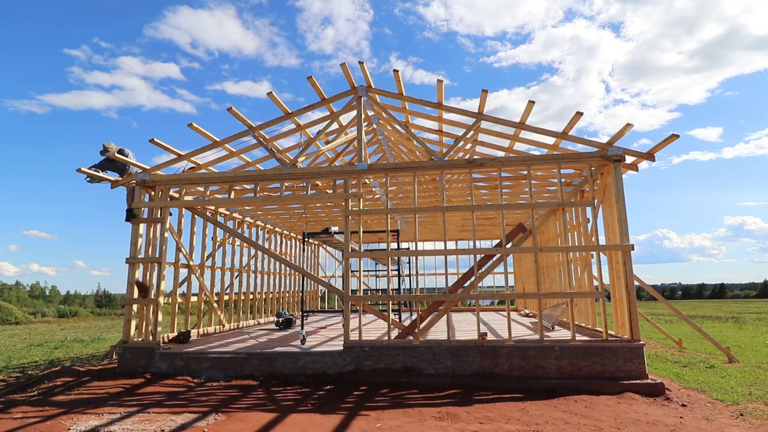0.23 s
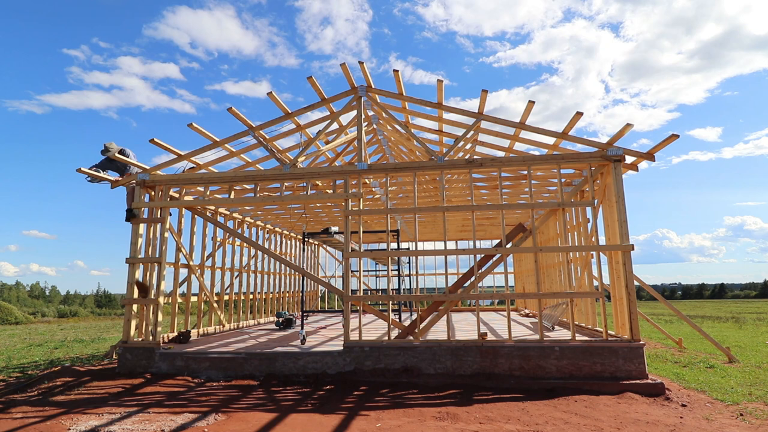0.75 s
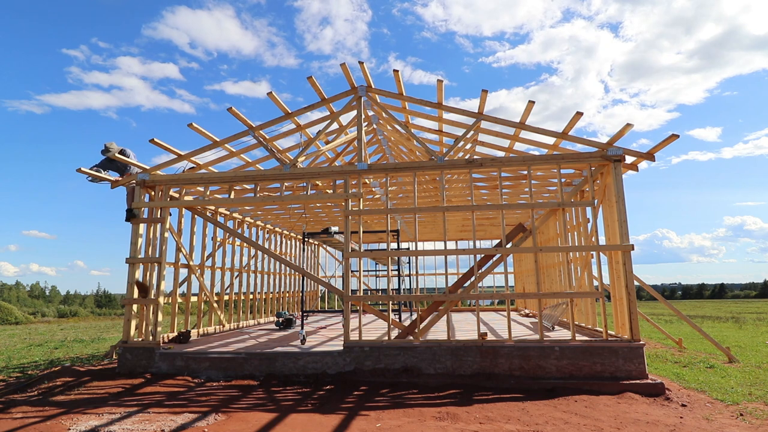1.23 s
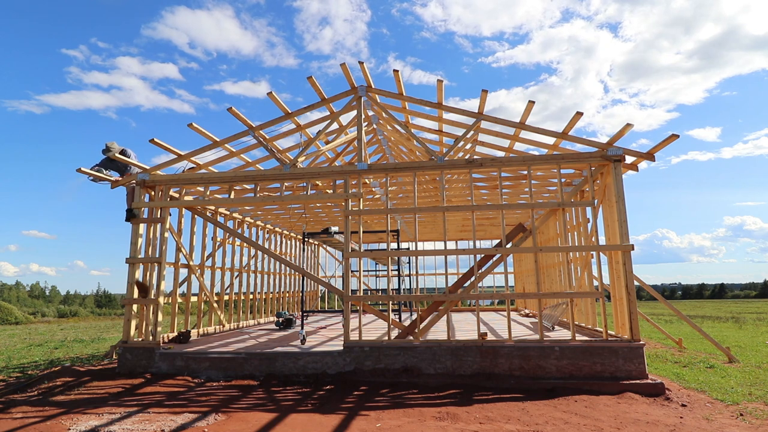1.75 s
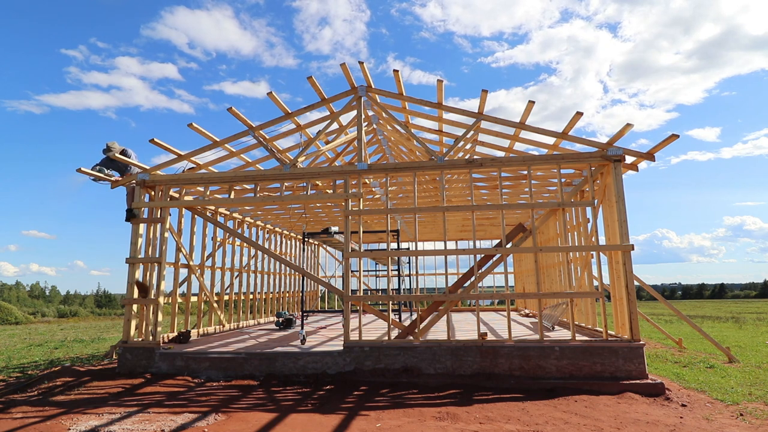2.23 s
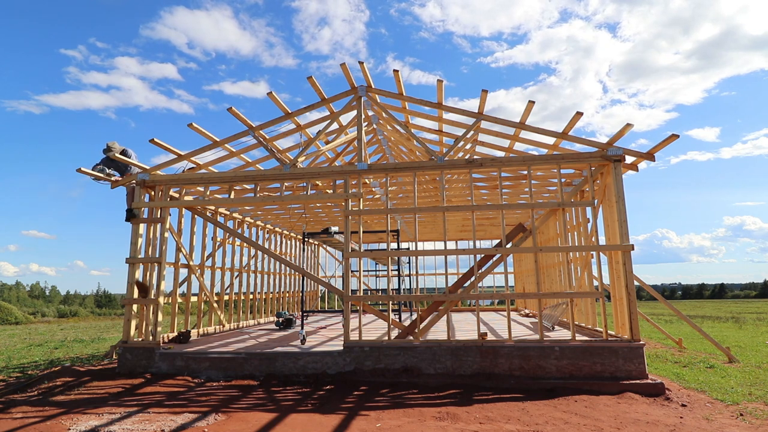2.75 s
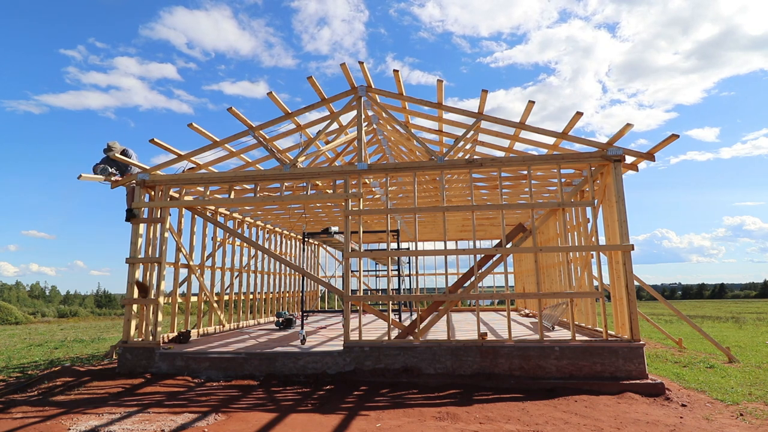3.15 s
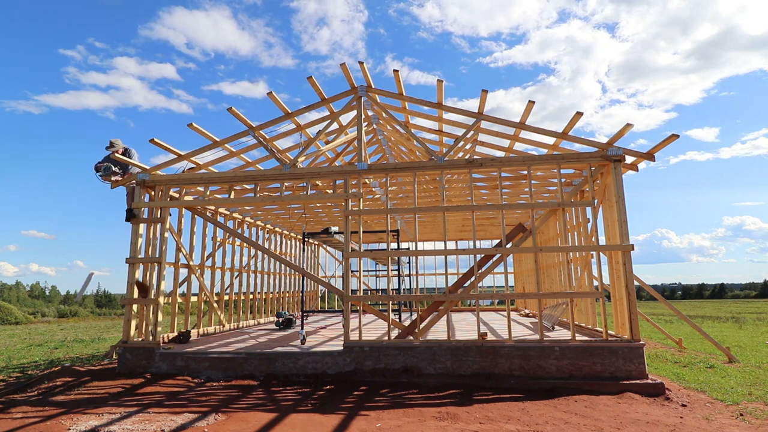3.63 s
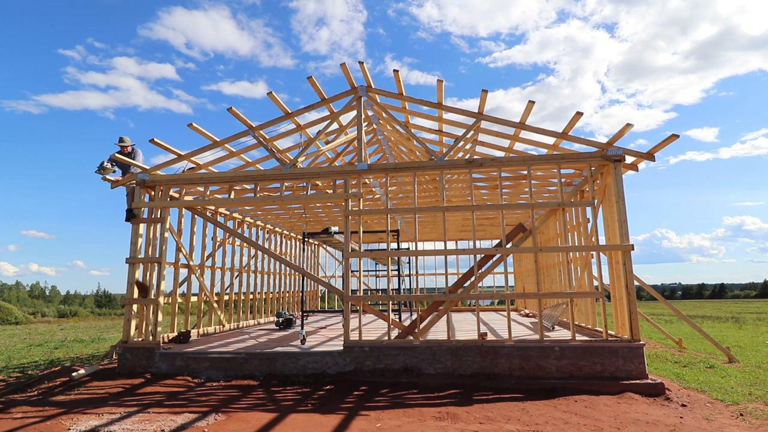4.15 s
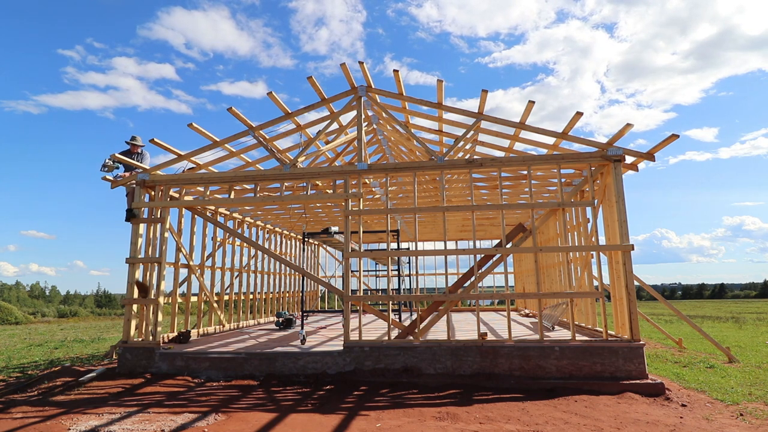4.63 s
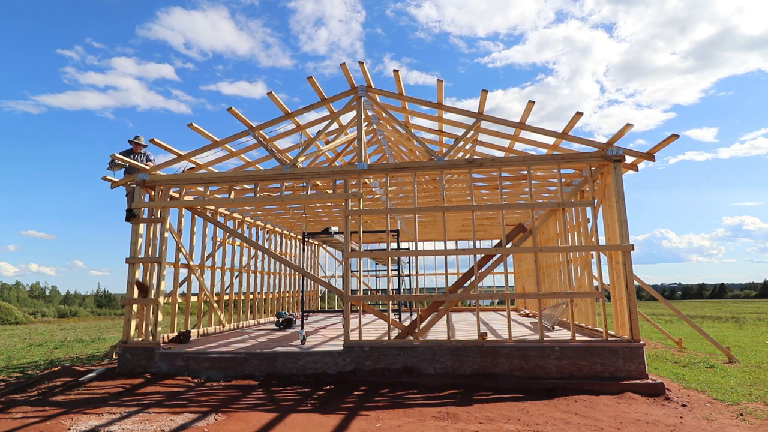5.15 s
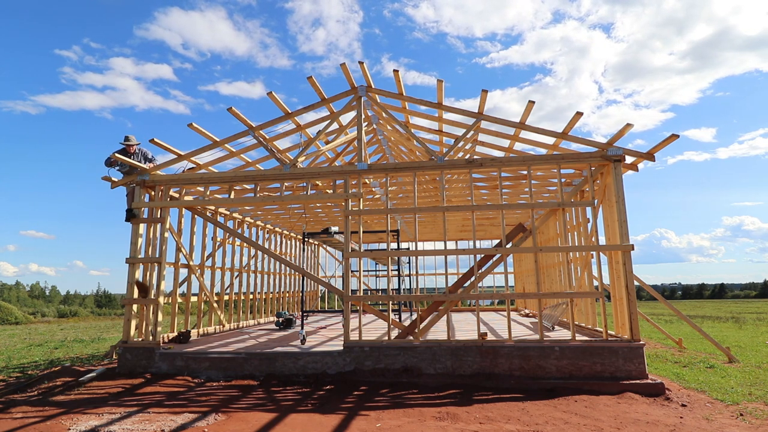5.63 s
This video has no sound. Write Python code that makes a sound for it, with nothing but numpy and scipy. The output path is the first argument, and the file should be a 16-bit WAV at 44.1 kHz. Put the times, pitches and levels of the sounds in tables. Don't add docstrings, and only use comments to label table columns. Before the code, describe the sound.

Some way off on an open timber frame, a circular saw cuts a board, its gear whine rising then sagging under load with gritty, ringing teeth. It breaks through, speeds up briefly, and brakes in a falling whine. The offcut lands with a sharp knock, low thud and small bounces. Wind rumbles on the microphone; sudden silence, then a rough scrape begins.

```python
import sys
import numpy as np
from scipy import signal
from scipy.fft import rfft, irfft
from scipy.io import wavfile
from scipy.ndimage import uniform_filter1d

SR = 44100
rng = np.random.default_rng(int(sys.argv[2]) if len(sys.argv) > 2 else 0)


def gain_from_db(level_db):
    decades = np.asarray(level_db, float) / 20
    return 10 ** decades


def bounce(signal):
    frames = np.transpose(np.atleast_2d(signal))
    limited = np.clip(frames, -1, 1)
    pcm = np.round(limited * 32767).astype(np.int16)
    wavfile.write(sys.argv[1], SR, pcm)


N = 259240

FREE_S, BRAKE_S = 3.4, 3.66
TURN_S, TURN_DB = 3.95, -9.5
CUT_S, SCRAPE_S = 5.5432, 5.8

# t/s, level/dB
BITE = [(0.0, -48), (0.78, -41), (1.16, -36.5), (1.36, -40.5), (1.41, -35.5), (1.85, -34.5), (1.9, -28.5),
        (1.93, -33), (2.26, -30.5), (3.1, -34.5), (3.22, -32), (3.3, -31.5), (3.31, -42), (3.36, -26.5),
        (3.41, -43), (3.44, -49)]


def evened(x):
    return x / np.sqrt(np.mean(abs(x) ** 2) + 1e-20)


def curves(rows):
    s, *columns = np.transpose(rows)
    return [np.interp(np.arange(N) / SR, s, c) for c in columns]


def step(s, db):
    return gain_from_db(db * np.clip((np.arange(N) / SR - s) / 0.03, 0, 1))


def bumps(rows):
    t = np.arange(N) / SR
    return gain_from_db(sum(db * np.exp(-((t - s) / half) ** 2) for s, half, db in rows))


def wander(count, hz):
    r = np.exp(-2 * np.pi * hz / SR)
    z = rng.standard_normal(count + 4000) + 1j * rng.standard_normal(count + 4000)
    smooth = signal.lfilter([1], [1, -r], signal.lfilter([1], [1, -r], z))
    return evened(smooth[4000:])


def coloured(x, tone):
    f, db = np.transpose(tone)
    hz = np.fft.rfftfreq(len(x), 1 / SR)
    gain = gain_from_db(np.interp(np.log(hz + 1), np.log(f + 1), db, left=-80, right=-80))
    return evened(irfft(rfft(x) * gain, len(x)))


def streaky_noise(tone, patch_db, streak_db):
    frames = N // 512 + 5
    a, b, patches, streaks = rng.standard_normal((frames, 1025, 4)).T
    patches = evened(uniform_filter1d(uniform_filter1d(patches, size=24, axis=0), size=7, axis=1))
    streaks = evened(uniform_filter1d(uniform_filter1d(streaks, size=2, axis=0), size=60, axis=1))
    z = (a + 1j * b) * gain_from_db(patch_db * patches + streak_db * streaks)
    noise = signal.istft(z, nperseg=2048, noverlap=1536)[1][:N]
    return coloured(noise, tone)


def speed():
    # t/s, gear mesh f/Hz
    mesh_points = [(0, 3620), (.22, 3758), (.45, 3905), (.75, 4015), (1.12, 4083), (1.42, 4060),
                   (1.75, 3985), (2.17, 3846), (2.32, 3754), (2.62, 3670), (2.92, 3626), (3.22, 3614),
                   (3.4, 3830), (3.66, 3838)]
    crawl_hz, brake_per_s = 200, 2.4
    braked_s = np.maximum(np.arange(N) / SR - BRAKE_S, 0)
    return crawl_hz + (curves(mesh_points)[0] - crawl_hz) * np.exp(-brake_per_s * braked_s)


def spells(mesh_hz):
    # swells from t/s, full t/s, fades from t/s, gone t/s, level/dB
    singing = [
        [(-.3, .8, 1.6, 2.7, -33.5), (3.28, 3.36, 3.716, 3.72, -31)],
        [(1.3, 2.1, 2, 3.2, -28), (2.2, 2.6, 2.7, 3.0, -27.5), (2.6, 2.95, 3.23, 3.5, -25)],
        [(-.3, 0.15, 0.17, 1.6, -24.5), (.2, .7, 1.9, 2.5, -36.5), (3.4, 3.62, 3.66, 3.74, -31)],
        [(.45, 1, 1.5, 2.5, -29)],
        [(-0.55, 0.43, 1.33, 5, -56)],
    ]
    # f/Hz, width/Hz, level/dB
    flares = [(3140, 1100, -25), (2460, 180, -34.5), (2125, 830, -20), (1724, 90, -18.5),
              (1548, 230, -12.5), (1118, 200, -26.5), (658, 100, -38.5)]
    t = np.arange(N) / SR
    depth_db = 26.5
    gains = []
    for rows in singing:
        gain = 0
        for start, full, fade, gone, db in rows:
            before = np.maximum((full - t) / (full - start), 0)
            after = np.maximum((t - fade) / (gone - fade), 0)
            gain = gain + gain_from_db(db - depth_db * (before + after))
        gains.append(gain)
    flare = sum(gain_from_db(db) / (1 + (2 * (mesh_hz - f) / w) ** 2) ** 2 for f, w, db in flares)
    gains[0] = gains[0] + flare * (t > BRAKE_S)
    return gains


def plate_steps(x):
    steel_modes = [3325, 3000, 2860, 2400, 2150, 1490, 1100]
    out = x.copy()
    r = np.exp(-np.pi * 22 / SR)
    for hz in steel_modes:
        poles = [1, -2 * r * np.cos(2 * np.pi * hz / SR), r * r]
        out += 1.6 * signal.lfilter([(1 - r * r) / 2, 0, (r * r - 1) / 2], poles, x)
    return out


def whine():
    orders = [1, .5, .281, .526, 3.02]
    flutters = [1.4, .08, .5, .3, .5]
    # delay/ms, level/dB
    stud_echoes = [(9, -24.5), (17, -23.5), (26, -21), (38, -11.5)]
    # start t/s, end t/s, start f/Hz, end f/Hz, level/dB
    hums = [
        (.1, .6, 358, 370, -40),
        (1.35, 2.45, 452, 384, -44),
        (1.6, 2.75, 264, 226, -49),
        (2.8, 3.2, 378, 376, -46),
        (3.6, 3.88, 250, 235, -45),
    ]
    mesh_hz = speed()
    strengths = spells(mesh_hz)
    turns = np.cumsum(mesh_hz) / SR
    braking = np.clip(-np.gradient(mesh_hz) * SR / 5000, 0, 1)
    out = np.zeros(N)
    for order, share, gain in zip(orders, flutters, strengths):
        flutter = share * (1 - braking) * wander(N, 30 * share)
        chatter = 1.3 * braking ** 3 * wander(N, 120)
        tone = (1 + flutter + chatter) * np.exp(2j * np.pi * order * turns)
        out += gain * gain_from_db(-3) * np.sqrt(2) * tone.real
    streak = wander(N, 130) * np.exp(2j * np.pi * 0.91 * turns)
    out += strengths[0] * gain_from_db(-3.5) * braking ** 4 * streak.real
    falling = plate_steps(out * braking)
    echoes = sum(gain_from_db(db) * np.roll(falling, round(ms * SR / 1000)) for ms, db in stud_echoes)
    out = out * (1 - braking) + falling + echoes
    for start, end, hz, last_hz, db in hums:
        t = np.arange(round(start * SR), round(end * SR))
        glide = np.cumsum(np.linspace(hz, last_hz, len(t))) / SR
        swell = signal.windows.tukey(len(t), 0.3)
        out[t] += gain_from_db(db) * np.sqrt(2) * swell * np.sin(2 * np.pi * glide)
    return out


def coasting(driven_db, loss_db, bend, rest_db):
    braked_s = np.maximum(np.arange(N) / SR - BRAKE_S, 0)
    return gain_from_db(driven_db - loss_db * braked_s ** bend) + gain_from_db(rest_db)


def bite():
    middle_db = -37.5
    return (curves(BITE)[0] - middle_db) * (np.arange(N) / SR < FREE_S)


def motor():
    # f/Hz, level per Hz/dB
    roar_tone = [(90, -42.5), (170, -20.5), (300, -10), (600, -4.5), (880, -6.5), (1070, 2), (1260, -3),
                 (1550, 2.5), (1950, -5), (2170, -1.5), (2450, -9), (3200, -5.5), (4500, -11),
                 (6000, -66.5)]
    # f/Hz, level per Hz/dB
    coast_tone = [(150, -30.5), (300, -21.5), (660, -12.5), (880, -17.5), (1080, -2.5), (1200, -7.5),
                  (1550, -2.5), (1950, -11.5), (2180, -6.5), (2750, -14.5), (3050, -2.5), (3400, -16),
                  (4900, -28.5), (6000, -27.5)]
    # f/Hz, level per Hz/dB
    rush_tone = [(1060, -18.5), (1800, 4), (2000, -31), (2200, 6.5), (2700, -31), (2810, -11.5),
                 (3550, -1.5), (3960, 2), (5390, -11.5), (7210, -4.5), (9000, -8), (11700, -54),
                 (19800, -120)]
    # f/Hz, width/Hz, level/dB
    brush_peaks = [(8320, 830, 3.5), (7680, 170, -1.5), (4950, 390, 3)]
    # t/s, half length/s, level/dB
    rush_swells = [
        (.1, .2, 3),
        (.9, 0.12, 3),
        (3.36, 0.057, 7),
        (3.6, 0.26, 1.5),
    ]
    mesh_hz = speed()
    blade_turns = np.cumsum(mesh_hz) / SR / 48
    throb = 1 + 0.081 * np.cos(2 * np.pi * blade_turns) + 0.12 * wander(N, 60).real
    driven = np.clip((mesh_hz - 1550) / 1900, 0, 1)
    surge_db = wander(N, 6) * step(FREE_S, -14)

    hz = np.fft.rfftfreq(N, 1 / SR)
    peaks = sum(gain_from_db(db) / (1 + (2 * (hz - f) / w) ** 2) for f, w, db in brush_peaks)
    brush = evened(irfft(rfft(rng.standard_normal(N)) * peaks, N))
    brush *= coasting(driven_db=-36, loss_db=12.5, bend=1, rest_db=-52)
    brush *= step(TURN_S, TURN_DB) * gain_from_db(3.8 * surge_db.imag)

    roar = np.sqrt(driven) * streaky_noise(roar_tone, 1.2, 2.4)
    roar += np.sqrt(1 - driven) * streaky_noise(coast_tone, 1.2, 2.8)
    roar *= coasting(driven_db=-21, loss_db=13.5, bend=2.5, rest_db=-40.5)
    roar *= step(BRAKE_S + 0.027, -2.5) * gain_from_db(-0.2 * bite() - 2)

    air = streaky_noise(rush_tone, 1.2, 2.6)
    air *= coasting(driven_db=-25, loss_db=36.5, bend=2.1, rest_db=-56) * bumps(rush_swells)
    air *= gain_from_db(0.44 * bite() + 2.8 * surge_db.real - 5.5)
    return throb * (roar + air + brush)


def ground(x):
    delay_ms, dull_hz, echo_db = 2.873, 820, -6
    f = np.fft.rfftfreq(N, 1 / SR)
    delay = np.exp(-2j * np.pi * f * delay_ms / 1000)
    echo = gain_from_db(echo_db) * delay / np.sqrt(1 + (f / dull_hz) ** 6)
    return irfft(rfft(x) * (1 + echo), N)


def blade():
    # start t/s, end t/s, f/Hz, level/dB
    rings = [(0.62, 0.85, 2904.0, -31), (0.6, 1.95, 2552.0, -38), (0.55, 1.7, 2205, -33),
             (0.64, 0.93, 2206, -25.5), (1.4, 2.1, 2382.0, -39), (0.7, 1.3, 4360.0, -38.8),
             (0.8, 1.05, 4002.0, -34.1), (0.8, 1.25, 4896.0, -40.7), (0.83, 1.1, 3381, -27),
             (0.9, 2.0, 10680.0, -43.5), (1.0, 1.4, 1631.0, -35.9), (0.9, 1.3, 2904.0, -29.5),
             (1.0, 2.0, 7343.0, -41.9), (1.05, 1.7, 3381, -32), (1.42, 1.63, 2904, -30),
             (1.35, 1.65, 2206, -23.5), (1.5, 1.72, 1561.0, -28.8), (2.0, 2.8, 7066.0, -41.2),
             (2.0, 3.0, 3173.0, -39.0), (2.3, 3.0, 6554.0, -41), (1.9, 2.3, 5771.0, -41),
             (2.3, 3.1, 1655.0, -36.6), (2.3, 3.0, 4834.0, -37), (2.55, 2.75, 2132.0, -32.1),
             (2.9, 3.15, 1580.0, -34.4), (3.27, 3.42, 2178.0, -29.0), (3.28, 3.5, 2140.0, -31.2),
             (3.3, 3.7, 2875.0, -36.5), (3.38, 3.8, 3327.0, -32), (3.9, 5.7, 3080.0, -54)]
    out = np.zeros(N + SR)
    for start, end, hz, db in rings:
        t = np.arange(round(start * SR), round(end * SR))
        flutter = evened(2e7 / (hz ** 2 + 6e6) + wander(len(t), 4 + 0.004 * hz))
        swell = signal.windows.tukey(len(t), min(0.12 / (end - start), 1))
        tone = (flutter * np.exp(2j * np.pi * hz * t / SR)).real
        out[t] += gain_from_db(db + 3) * np.sqrt(2) * swell * tone
    return out[:N]


def spray():
    # t/s, level/dB, decay/s
    splinters = [
        (3.981, -36, .012),
        (4.024, -33, 0.0098),
    ]
    t = np.arange(N) / SR
    windage = coasting(driven_db=-38.5, loss_db=18, bend=2.1, rest_db=-70.5) * step(TURN_S, TURN_DB)
    windage *= gain_from_db(-32 * np.maximum(BRAKE_S - t, 0))
    grit = sum(gain_from_db(db) * (t > s) * np.exp(-np.maximum(t - s, 0) / decay) for s, db, decay in splinters)
    cutting = gain_from_db(curves(BITE)[0] + 5) * np.clip((BITE[-1][0] - t) / 0.041, 0, 1)
    return cutting + windage + grit


def plate():
    # f/Hz, level/dB
    plate_modes = [(2406, -47), (2719, -48), (2869, -42), (3171, -44), (3811, -46), (4210, -48),
                   (4527, -50), (4840, -45), (5023, -49), (5313, -52), (5766, -48), (6557, -47),
                   (6928, -49), (7068, -46), (7257, -48), (7450, -47), (7531, -48), (8231, -48),
                   (8603, -48), (9383, -49), (9728, -52), (10174, -50), (10654, -51), (10750, -52),
                   (11090, -53), (11876, -53), (12236, -56), (12888, -57)]
    frames, hz = N // 1024 + 5, np.fft.rfftfreq(4096, 1 / SR)
    a, b = rng.standard_normal((frames, len(hz), 2)).T
    comes = evened(uniform_filter1d(rng.standard_normal((frames, len(plate_modes))), size=10, axis=0)).T
    gain = 0
    for (f, db), c in zip(plate_modes, comes):
        gain = gain + gain_from_db(db + 4 * c) / (1 + ((hz[:, None] - f) / (7 + 0.0015 * f)) ** 2)
    murmur = signal.istft((a + 1j * b) * gain, nperseg=4096, noverlap=3072)[1][:N]
    return spray() * gain_from_db(0.14) * evened(murmur)


def chips():
    # f/Hz, level per Hz/dB
    chip_tone = [(2940, -40.5), (5000, -10), (5420, -2.5), (6620, -2.5), (7170, -2), (7850, -12),
                 (8510, 4.5), (10100, -4.5), (13600, -6), (15600, -11.5)]
    sizes = gain_from_db(4.5 * np.minimum(rng.exponential(1, N), 5))
    snaps = rng.standard_normal(N) * sizes * (rng.random(N) < 6000 / SR)
    mix = 0.35 * coloured(snaps, chip_tone) + streaky_noise(chip_tone, 1.5, 3.6)
    gusts = gain_from_db(2.75 * wander(N, 30).real)
    return spray() * evened(mix * gusts)


def offcut():
    # f/Hz, level/dB, time to fall 60 dB/s
    wood_modes = [(473, 12.5, 0.012), (940, -2.5, 0.065), (1770, -8.5, 0.04), (2050, -18.5, 0.058),
                  (3075, -2, 0.017), (3973, -6.5, 0.048)]
    # t/s, peak level/dB, pitch factor, ring time factor
    knocks = [
        (3.982, -5, 1.01, 0.85),
        (4.009, -25, 0.88, 0.55),
        (4.027, -38, 0.5, 0.92),
        (4.259, -24, 0.88, 0.32),
        (4.284, -34, 0.5, 2.3),
        (4.407, -37, 0.49, 0.74),
        (4.52, -38, 0.59, 2.1),
        (4.826, -43, 0.91, 0.91),
        (5.285, -44, 0.68, 1.8),
    ]
    out, t = np.zeros(N + SR), np.arange(SR // 2) / SR
    for s, db, pitch, slow in knocks:
        ring = sum(gain_from_db(d - 60 * t / (t60 * slow)) * np.sin(2 * np.pi * f * pitch * t)
                   for f, d, t60 in wood_modes)
        out[round(s * SR):][:len(t)] += gain_from_db(db) * ring * (1 - np.exp(-t / 0.00015))
    out = signal.sosfilt(signal.butter(2, 190, "high", fs=SR, output="sos"), out)
    thud_s, thud_hz, thud_db, rise_s = 4.005, 62, -18, 0.105
    swell = (t / rise_s * np.exp(1 - t / rise_s)) ** 3
    out[round(thud_s * SR):][:len(t)] += gain_from_db(thud_db) * swell * np.sin(2 * np.pi * thud_hz * t)
    return out[:N]


def gusting():
    # t/s, level/dB
    gust_times = [(.03, -32), (.25, -32), (.39, -37), (.57, -40), (.85, -41), (1.08, -40), (1.27, -33.5),
                  (1.78, -39.5), (2.15, -37), (2.62, -39.5), (2.82, -40.5), (3.06, -45), (3.56, -31.5),
                  (3.9, -30.5), (4.02, -28.5), (4.14, -26), (4.46, -30.5), (4.88, -43), (5.12, -39),
                  (5.26, -42), (5.519, -42.5)]
    t = np.arange(N) / SR
    breeze = gain_from_db(-37 + 4 * np.clip((t - 3.7) / 0.19, 0, 1))
    return breeze + sum(gain_from_db(db) * np.exp(-((t - s) / 0.04) ** 2) for s, db in gust_times)


def wind():
    # f/Hz, level per Hz/dB
    wind_tone = [(7.1, -25), (12, 18.5), (27, 10), (51, 9), (195, -12.5), (258, -17), (326, -23.5),
                 (361, -20), (400, -24.5), (520, -31.5), (880, -120)]
    swings = coloured(rng.standard_normal(N), wind_tone)
    power = uniform_filter1d(uniform_filter1d(swings ** 2, size=3000), size=3000)
    steady = swings / np.sqrt(abs(power) + 0.0092)
    return gusting() * steady


def scrape():
    # t/s, level/dB
    fade_in = [(5.8, -79), (5.832, -87), (5.835, -67), (5.848, -67), (5.851, -51), (5.865, -46.5),
               (5.88, -44)]
    # f/Hz, level per Hz/dB
    scrape_tone = [(59, -60), (100, -17), (654, -13), (917, -14.5), (1230, -13), (1430, -18.5),
                   (2220, -13.5), (2690, -18), (3850, -13), (5280, -31), (15500, -61)]
    grit = rng.standard_normal(N) * gain_from_db(2.3 * wander(N, 300).real)
    return gain_from_db(curves(fade_in)[0]) * coloured(grit, scrape_tone) * (np.arange(N) / SR > SCRAPE_S)


def scene():
    # t/s, half length/s, level/dB
    lurches = [
        (0.783, 0.038, -2.5),
        (3.417, .05, -3),
        (3.588, 0.089, 2),
    ]
    saw = bumps(lurches) * (ground(motor() + whine()) + blade() + plate() + chips())
    self_noise = gain_from_db(-60) * rng.standard_normal(N)
    before_cut = np.clip((CUT_S - np.arange(N) / SR) / 0.0013, 0, 1)
    return ((saw + offcut() + wind() + self_noise) * before_cut + scrape())[None]


def top_cut(x):
    return signal.sosfilt(signal.butter(12, 15710, fs=SR, output="sos"), x)


def record(dry):
    over_db = np.maximum(20 * np.log10(abs(dry[0]) + 1e-9) + 8.5, 0)
    fall = np.arange(N) * 90 / SR
    duck_db = np.maximum.accumulate(over_db + fall) - fall
    late = np.roll(uniform_filter1d(duck_db, size=90), 130)
    mix = 0.7 * np.tanh(dry / gain_from_db(0.4 * late) / 0.81)
    return top_cut(mix)


dry = scene()
out = record(dry)
bounce(out)
```